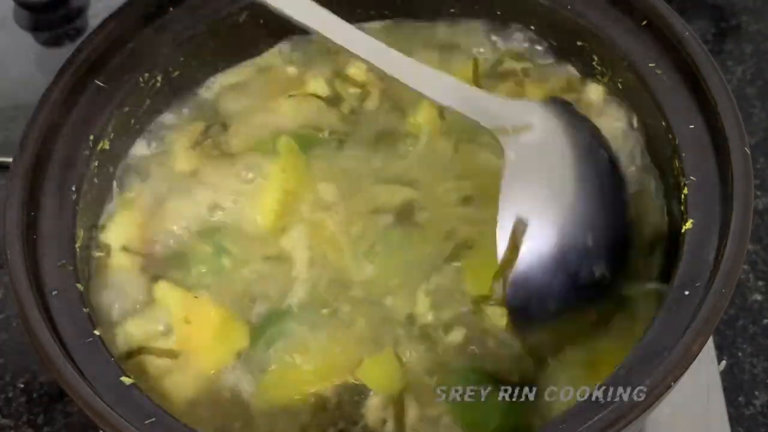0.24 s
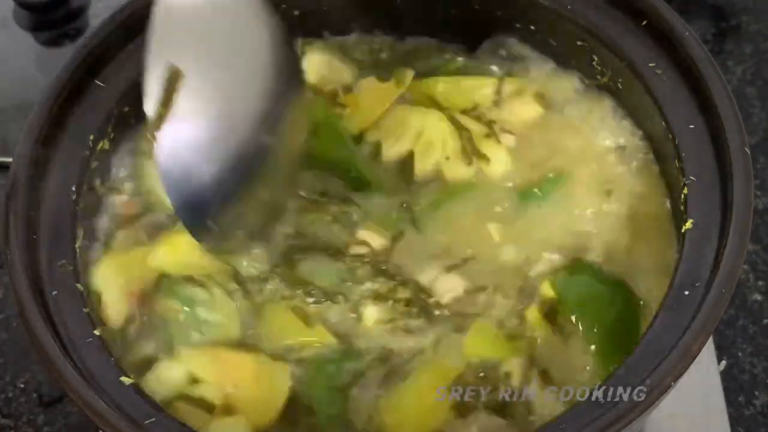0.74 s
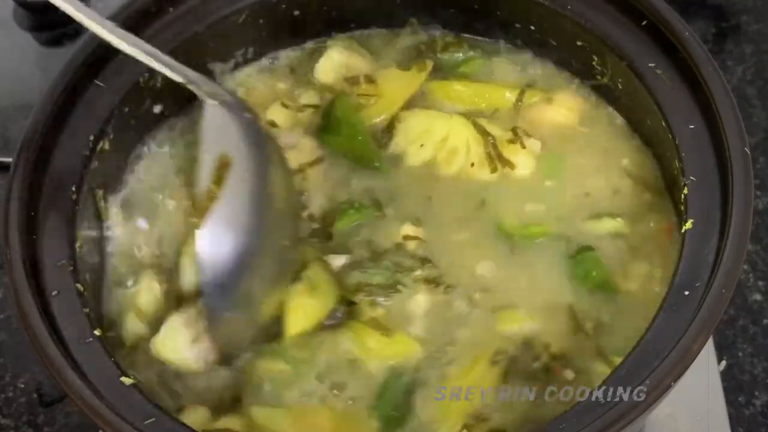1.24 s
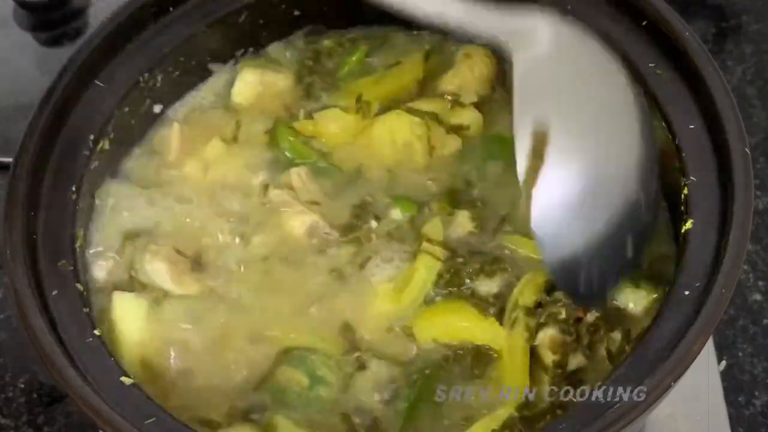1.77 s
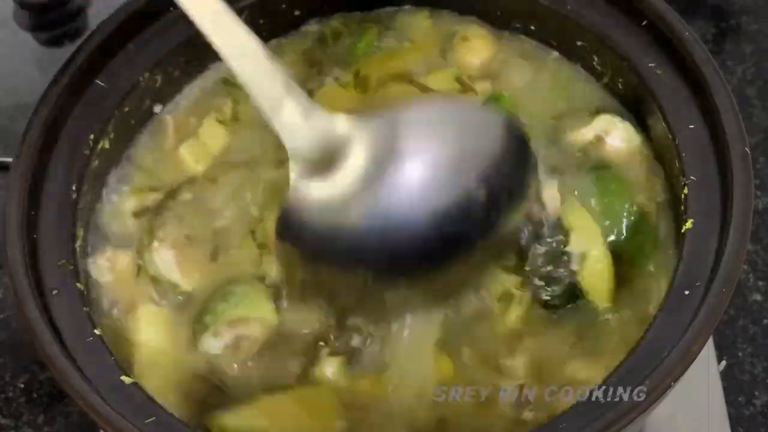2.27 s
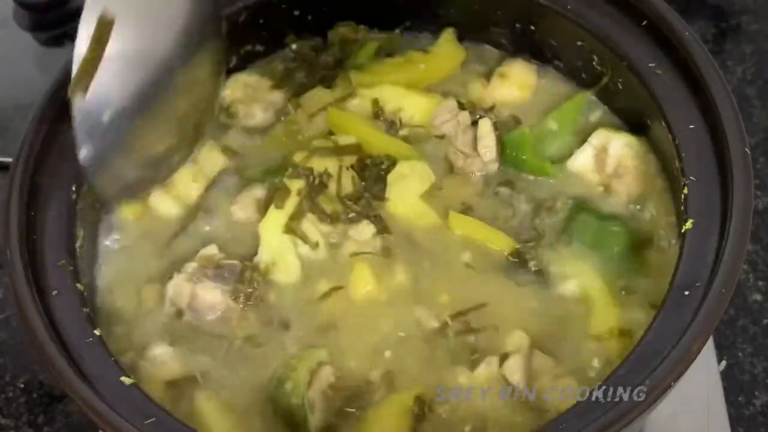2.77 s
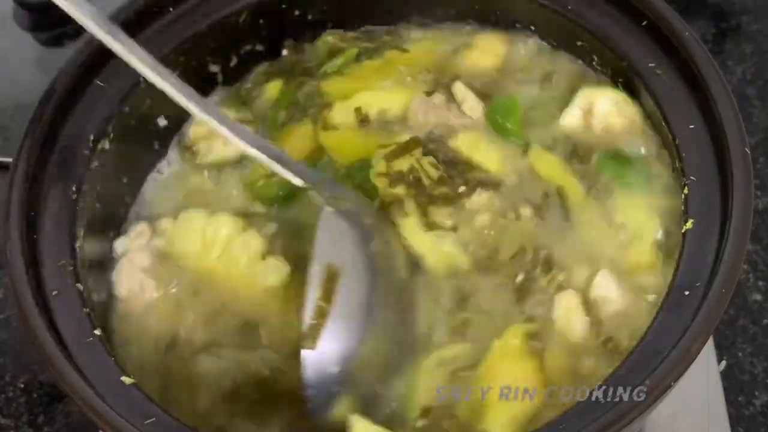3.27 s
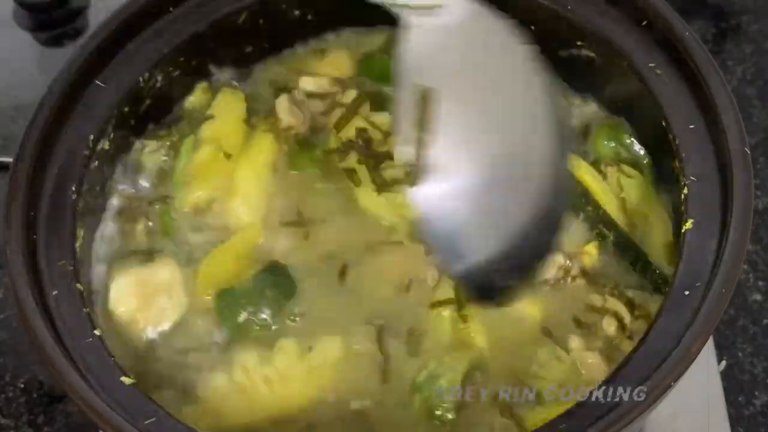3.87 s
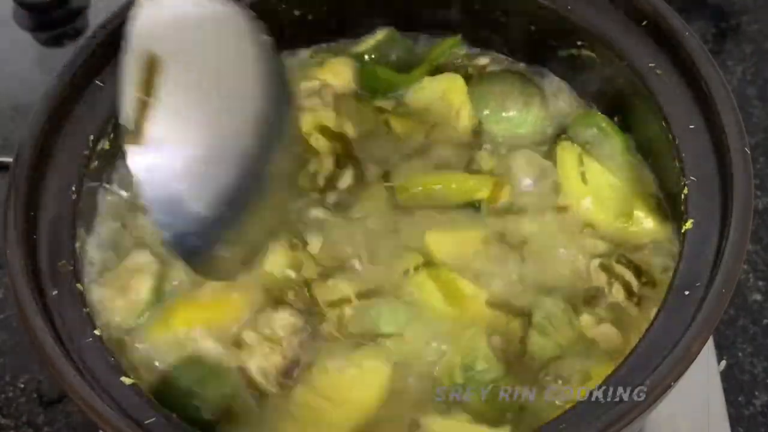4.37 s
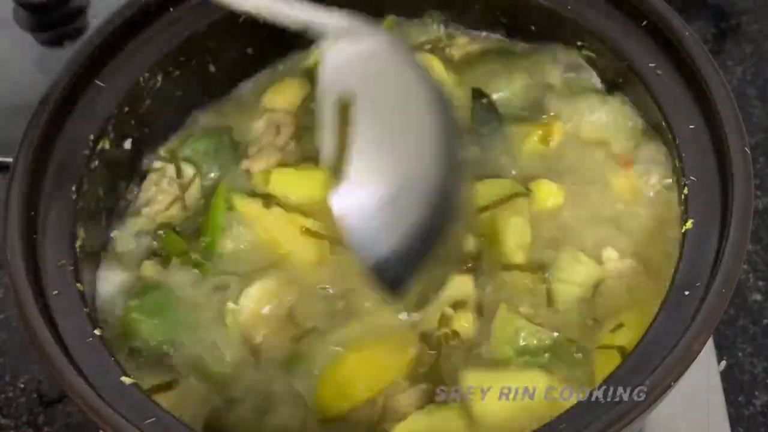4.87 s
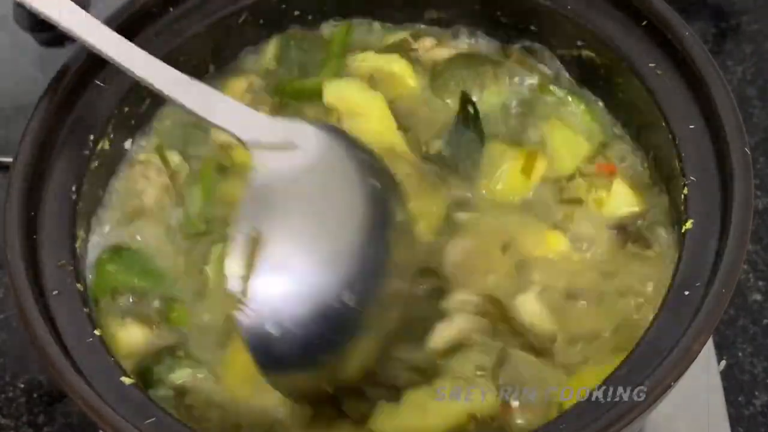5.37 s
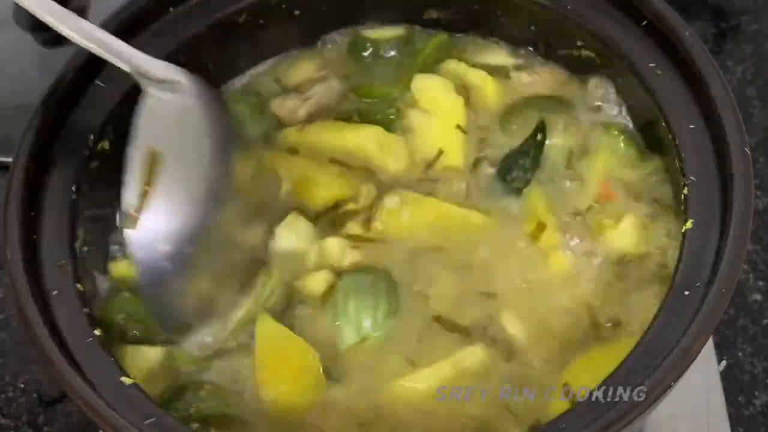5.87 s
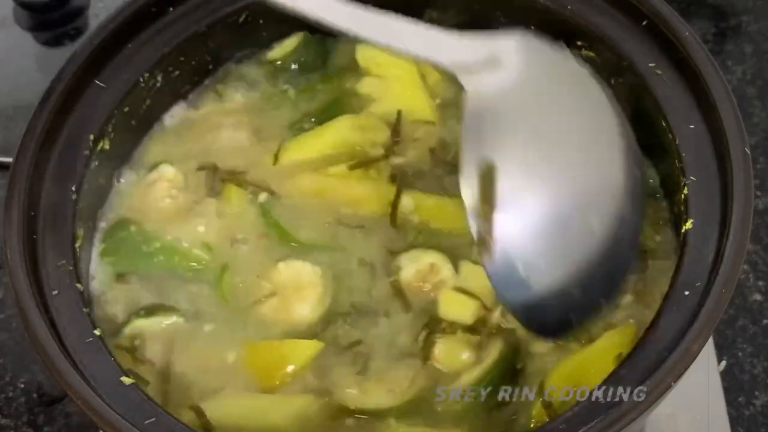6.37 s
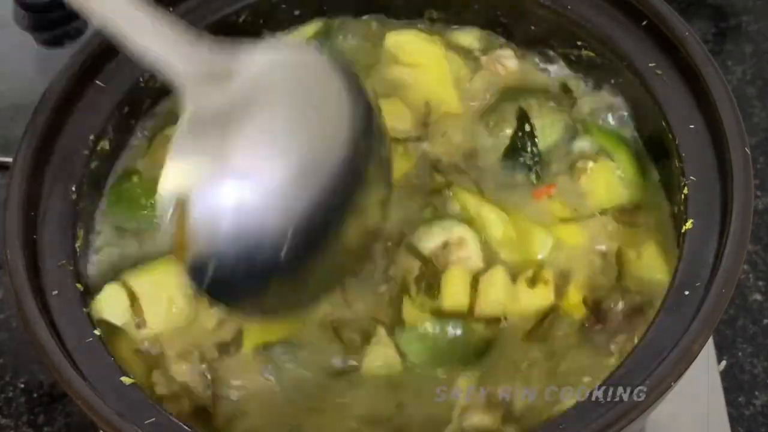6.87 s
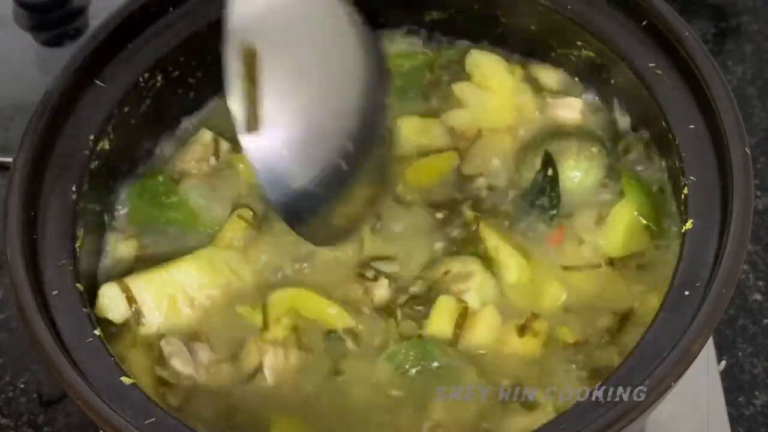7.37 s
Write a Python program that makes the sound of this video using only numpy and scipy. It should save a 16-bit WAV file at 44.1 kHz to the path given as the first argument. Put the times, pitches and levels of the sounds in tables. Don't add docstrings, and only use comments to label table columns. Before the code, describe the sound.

A thick soup simmers in a pot on a gas burner, heard very close in stereo in a small hard kitchen. Bubbles pop and glug, droplets tick on the hot wall. Near two seconds a steel ladle clinks and scrapes, then clinks louder with a quick rebound and drags. Bubbling carries on alone until a late ringing clink, and a hard dull knock under the soup near the end.

```python
import sys
import numpy as np
from scipy import signal
from scipy.fft import rfft, irfft, next_fast_len
from scipy.io import wavfile
from scipy.ndimage import uniform_filter1d, map_coordinates

SR = 44100
rng = np.random.default_rng(int(sys.argv[2]) if len(sys.argv) > 2 else 0)


def volts_from_decibels(level):
    exponent = np.asarray(level, float) / 20
    return 10 ** exponent


def int16_out(signal):
    q = np.round(np.clip(np.atleast_2d(signal).T, -1, 1) * 32767)
    wavfile.write(sys.argv[1], SR, q.astype(np.int16))


N = 336924


def unit(x):
    return x / np.sqrt(np.mean(x ** 2) + 1e-20)


def along(points, hz):
    f, v = np.transpose(points)
    return np.interp(np.log(hz + 1), np.log(f + 1), v)


def wobble(rate):
    knots = rng.standard_normal(int(N * rate / SR) + 4)
    return map_coordinates(knots, [np.arange(N) * rate / SR])


def filtered(x, response):
    m = next_fast_len(x.shape[-1] + 8192)
    return irfft(rfft(x, m) * response(np.fft.rfftfreq(m, 1 / SR)), m)[..., :x.shape[-1]]


def coloured(x, spectrum):
    return unit(filtered(x, lambda hz: volts_from_decibels(along(spectrum, hz))))


# f/Hz, correlation/1
ALIKE = [(70, .985), (200, .85), (350, .35), (620, .75), (1100, .65), (2300, .6), (4000, .25), (6500, .45),
         (8300, .97), (15000, .99)]


def rush(spectrum, patchy_db):
    z = signal.stft(rng.standard_normal((2, N)), nperseg=512)[2]
    field = uniform_filter1d(rng.standard_normal(z.shape[1:]), size=6, axis=0)
    field = uniform_filter1d(field, size=8, axis=1)
    pair = signal.istft(z * volts_from_decibels(patchy_db * unit(field)), nperseg=512)[1][:, :N]

    def mid_side(hz):
        angle = np.arccos(np.clip(along(ALIKE, hz), -1, 1)) / 2
        return volts_from_decibels(along(spectrum, hz)) * [np.cos(angle), np.sin(angle)]

    mid, side = filtered(pair, mid_side)
    return unit(np.array([mid + side, mid - side]))


def bubbles(s, gain, hz, t60, rise, size):
    t = np.arange(size) / SR
    hz, t60 = hz[:, None], t60[:, None]
    shape = volts_from_decibels(-60 * t / t60) * (1 - np.exp(-t * hz * 2.45))
    wave = gain[:, None] * shape * np.sin(2 * np.pi * hz * t * (1 + rise * t / t60))
    at = np.round(s * SR).astype(int)[:, None] + np.arange(size)
    return np.bincount(at.ravel(), wave.ravel(), N + size)[:N]


def swarm(count, centre_hz, octaves, cycles, spread_db, size):
    when, pitch, loud, sign = rng.random((count, 4)).T
    hz = centre_hz * 2 ** (octaves * (2 * pitch - 1))
    gain = volts_from_decibels(-spread_db * np.log(1.02 - loud)) * np.sign(sign - 0.5)
    return unit(bubbles(when * N / SR, gain, hz, cycles / hz, 0.2, size))


def impulses(s, db):
    return np.bincount(np.round(s * SR).astype(int), volts_from_decibels(db), N)[:N]


def puffs(s, db, t60):
    fade = volts_from_decibels(-60 * np.arange(2000) / SR / t60)
    return signal.fftconvolve(impulses(s, db), fade)[:N] * rng.standard_normal(N)


# f/Hz, width/Hz, level/dB
FILLED = [(115, 70, -4.5), (221.9, 23, 4), (626, 123, 1.5), (1400, 480, -4.5), (2373, 310, -6.5),
          (2900, 570, -6.5), (6000, 11000, -27.5)]


def full_pot(blows):
    def response(f):
        total = 0
        for k, (centre, width, db) in enumerate(FILLED):
            damping = 1j * f * width
            total = total + (-1) ** k * volts_from_decibels(db) * damping / (centre ** 2 - f ** 2 + damping)
        return total

    return filtered(blows, response)


# t/s, level/dB
BOIL = [(0.0, -49.5), (0.45, -57), (1.87, -57.5), (1.98, -52.5), (2.42, -59.5), (2.77, -56), (2.92, -55),
        (3.19, -59), (3.55, -54), (3.81, -64.5), (4.15, -68), (5.28, -59.5), (6.15, -64), (7.64, -58)]


def vigour():
    return np.interp(np.arange(N) / SR, *np.transpose(BOIL))


def strays(count):
    when, loud, pitch = rng.random((count, 3)).T
    db = vigour()[(when * N).astype(int)] + 12 + 8 * loud
    return np.transpose([when * N / SR, db, 1200 * 2 ** (0.55 * (2 * pitch - 1))])


# t/s, peak level/dB, f/Hz
POPS = [(0.01, -35, 1570), (0.067, -33, 800), (0.105, -46, 800), (0.302, -31.5, 900), (0.833, -35.5, 1320),
        (1.235, -38, 830), (1.281, -38, 1610), (1.325, -39, 920), (1.505, -39, 1500), (1.629, -38, 1320),
        (2.37, -39.5, 896), (2.471, -37, 1200), (2.713, -35, 900), (3.194, -30, 1780), (3.57, -32.5, 1280),
        (4.065, -45, 814), (4.703, -40.5, 802), (4.772, -42, 1460), (4.87, -40, 1640), (4.924, -38.5, 820),
        (5.133, -38.5, 1400), (5.412, -38, 1500), (5.47, -38.5, 815), (5.882, -32.5, 1250),
        (6.223, -38, 900), (6.632, -33, 2380), (6.726, -39, 1360), (7.018, -45, 886), (7.303, -39.5, 1700),
        (7.539, -38.5, 870),
        (0.316, -48, 619), (0.409, -44, 622), (0.984, -44, 638), (1.102, -42.5, 595), (1.315, -41, 773),
         (1.425, -36, 619), (1.811, -42, 713), (2.409, -41, 603), (2.57, -39, 802), (3.301, -43, 705),
         (3.729, -51, 641), (4.063, -44, 606), (4.428, -44, 802), (4.6, -44, 643), (4.86, -42, 791),
         (4.914, -51.5, 813), (5.245, -45.5, 622), (5.339, -42.5, 646), (5.463, -40, 807),
         (5.582, -42, 614), (6.204, -43.5, 633), (6.372, -37, 684), (6.563, -43.5, 641), (6.852, -43, 646),
         (7.352, -41, 646), (7.551, -56, 638)]
# t/s, peak level/dB, body level/dB
SPITS = [(0.803, -44.5, -16), (1.276, -54.5, -11), (2.36, -46, -18), (2.6396, -44.5, 0),
         (3.164, -38.5, -16), (3.1966, -44, 10), (3.7908, -48, 6), (4.1434, -47.5, -11.5),
         (4.1719, -52.5, -21), (4.4186, -44, -17.5), (4.5284, -41, 3), (4.5494, -46, -16),
         (4.5852, -44, -21), (4.658, -47, -14), (4.799, -44, -10), (4.8309, -44, -3),
         (4.8724, -43.5, -13.5), (4.9245, -38.5, 1.5), (4.9357, -37.5, -20), (5.1054, -50.5, -21),
         (5.3453, -47, -24), (5.4256, -49.5, -17), (6.1489, -45, -24), (6.2352, -42.5, -16),
         (6.2992, -45, 2), (6.3794, -47, -2), (6.8553, -43, -6), (6.9232, -42, -17), (7.3543, -46, 13.5),
         (7.452, -48.5, -14)]
# f/Hz, level/dB
FIZZ = [(1000, 11), (2500, 7), (4200, 0.5), (6500, -9), (8000, 1), (10000, 3.5), (13500, 1), (15700, -18.5)]


def bursts():
    s, db, hz = np.vstack([POPS, strays(count=110)]).T
    t60 = 0.018 * (1000 / hz) ** 1.6
    pops = bubbles(s, volts_from_decibels(db + 6.5), hz, t60, 0.019, size=1300)
    jolts = volts_from_decibels(18.5) * full_pot(puffs(s, db, t60=0.006))
    s, db, body_db = np.transpose(SPITS)
    ticks = filtered(puffs(s, db + 3.0, 0.013), lambda f: volts_from_decibels(along(FIZZ, f)) * (f > 5000))
    bodies = filtered(puffs(s, db + body_db + 8, 0.009), lambda f: 1 / (1 + ((f - 4000) / 1300) ** 4))
    return pops + jolts + ticks + bodies


# t/s, peak level/dB, place on the wall/1 (0 to 2), glancing/1 (0 square, 1 glancing)
CLINKS = [
    (1.868, -9.5, 0.24, 0.26),
    (2.7729, -7.5, 0.84, 0.39),
    (2.884, -14, 1.08, 0.9),
    (5.7293, -8.5, 1.44, 0.26),
]
# level/dB at place 0, place 1, place 2, t60/s
WALL = [(-26, -11.5, -19, 0.29), (-18, -37, -45.5, .38), (-4, -26, -32, .3), (-17, -23, -19, .18),
        (-12.5, -15.5, -25, .25), (-17.5, -14.5, -13.5, 0.42), (0.5, -3, -29, .25), (-2, -5.5, -31.5, 0.24),
        (-13.5, -22, -20, .34), (-22, -6, -45, .15), (-14, -11, -10, .1), (-17.5, -26.5, -44, .44),
        (-25, -21.5, -24, 0.35), (-44.5, -29, -31, .27)]
# level/dB at place 0, place 1, place 2, t60/s
LADLE = [(-14.5, -15.5, -18.5, 0.75), (-16, -16, -13, .4), (-4, -7, 3.5, .5), (-1, -8, 11, .45),
         (-17, -7, -6, .35), (-21, -7.5, -16, .35), (-24, -9, -14, 0.25), (-36, -14, -23, 0.54),
         (-34.5, -8, -15, .38), (-35, -13, -20, .13), (-33.5, -15.5, -21, 0.49), (-23.5, -13.5, -15.5, .35),
         (-34, -21, -2.5, 0.1), (4.5, -25.5, -8, 0.042)]
WALL_HZ = [689, 793, 877, 1200, 1660, 1810, 1903, 1935, 2200, 2488, 2800, 3095, 3725, 6900]
LADLE_HZ = [3242, 3300, 3330, 3360, 3410, 3483, 3540, 5135, 5265, 5545, 7140, 7285, 9420, 13050]
# f/Hz, level/dB at place 0, place 1, place 2
BOWL = [(1922, -24, -15, -12), (3371, 7.5, -6.5, 7), (5346, -59, -4, -23.5)]
# f/Hz, level/dB
CRACK = [(150, -41), (450, -34), (800, -8.5), (1300, -12), (2000, -5.5), (3400, 3), (4600, -17.5),
         (7500, -12), (8500, -41), (16000, -41)]


def clinks():
    size = 21000
    out, t = np.zeros((2, N + size)), np.arange(size) / SR
    late = t - np.array([[0], [70e-6]])
    scatter = 0.1
    hz = np.c_[WALL_HZ + LADLE_HZ]
    *places_db, t60 = np.transpose(WALL + LADLE)[..., None]
    for s, db, place, glancing in CLINKS:
        length = 1.08 + 0.72 * glancing
        crack_db = -7 + 3 * glancing
        tick_db = -18.5 + 14.5 * glancing
        level_db = sum(np.clip(1 - abs(place - k), 0, 1) * at_db for k, at_db in enumerate(places_db))
        fade = volts_from_decibels(-60 * t / (t60 * length)) + 0.937 * volts_from_decibels(-60 * t / 0.068)
        drift = rng.standard_normal((2, 2, len(hz), 35))
        size_drift, phase_drift = signal.resample(drift, size, axis=3)
        turns = hz * late[:, None] + scatter * rng.standard_normal((2, len(hz), 1))
        turns += 0.13 * phase_drift * np.tanh(t / 0.08)
        modes = volts_from_decibels(level_db - 18.0 + 4.7 * size_drift) * fade * np.sin(2 * np.pi * turns)
        ring = modes.sum(axis=1)
        for bowl_hz, *bowl_db in BOWL:
            face = bowl_hz * late + scatter * rng.standard_normal((2, 1))
            pulse = np.exp(-((t - 0.0035) / 0.005) ** 2)
            ring += volts_from_decibels(np.interp(place, range(3), bowl_db) - 2.5) * pulse * np.sin(2 * np.pi * face)
        crack_fade = volts_from_decibels(-60 * t / 0.044) + 0.11 * volts_from_decibels(-60 * t / 0.12)
        crack = volts_from_decibels(crack_db) * crack_fade * coloured(rng.standard_normal(size), CRACK)
        tick = volts_from_decibels(tick_db - 60 * t / 0.018) * coloured(rng.standard_normal(size), FIZZ)
        onset = 1 - np.exp(-(t / 0.001) ** 2)
        start = round(s * SR)
        out[:, start:][:, :size] += volts_from_decibels(db) * (ring + crack + tick) * onset
        swell = np.exp(-t[::-1] / 0.006) * coloured(rng.standard_normal(size), CRACK)
        out[:, :start + 20][:, -size:] += volts_from_decibels(db - 22) * swell
    return out[:, :N]


# t/s, thud level/dB, tone f/Hz, tone level/dB
KNOCKS = [
    (1.854, -48, 1500, -27),
    (7.041, -33.5, 2230, -29),
    (7.1631, -13, 1400, -11),
]


def knocks():
    s, db, hz, bowl_db = np.transpose(KNOCKS)
    thud = full_pot(impulses(s, db + 16.0) + puffs(s, db + 14, 0.034))
    return thud + bubbles(s, volts_from_decibels(bowl_db), hz, np.array([0.014, 0.018, 0.009]), 0, size=1500)


# t/s at full pressure, rise/s, hold/s, level/dB, edge level/dB
SCRAPE = [
    (2.072, 0.022, 0.033, -42, -5.5),
    (2.914, 0.028, 0.12, -44, 0),
    (3.543, 0.16, 0.02, -44, -7),
    (6.628, 0.069, .005, -52, -7),
    (7.174, 0.0097, 0.029, -40.5, -5.5),
]
# f/Hz, level/dB
RASP = [(250, -28), (450, -5), (700, -2), (1000, 0.5), (1400, -4), (2200, -2.5), (3200, -4.5), (4500, -20)]
# f/Hz, level/dB
EDGE = [(1200, -27.5), (2500, 13), (3800, 11.5), (5200, 8), (7500, -2), (9000, -9), (15700, -50.5)]


def scrape():
    out = np.zeros((2, N))
    crowd = swarm(count=2500, centre_hz=1400, octaves=0.6, cycles=8.7, spread_db=2.5, size=500)
    rasp = 0.66 * rush(RASP, patchy_db=2.5) + 0.55 * coloured(crowd, RASP)
    edge = rush(EDGE, patchy_db=3)
    chatter = volts_from_decibels(1.6 * wobble(70))
    t = np.arange(N) / SR
    for s, rise, hold, db, edge_db in SCRAPE:
        lifting = np.clip(t - s - hold, 0, None)
        press_db = db - 19 * np.clip(s - t, 0, None) / rise - 111 * lifting
        edge_gain = volts_from_decibels(edge_db - 1.5 - 13.5 * lifting)
        out += volts_from_decibels(press_db + 3.0) * chatter * (rasp + edge_gain * edge)
    return out


# f/Hz, level/dB
RUMBLE = [(22, -54), (40, -5), (55, 0), (105, 1), (135, -3.5), (230, -2), (330, -12), (450, -27),
          (900, -55.5)]
# f/Hz, level/dB
BROTH = [(250, -22), (400, -14), (640, 4), (870, -4), (1050, -5), (1400, -11), (2100, -16.5), (3500, -9),
         (6000, -38), (12000, -40.5)]


def simmer():
    vigour_db = vigour()
    swing_db = vigour_db - vigour_db.mean()
    rumble_db = -55 + 0.15 * swing_db
    broth_db = vigour_db + 1
    fizz_db = -59.5 + 0.19 * swing_db - 0.05 * np.arange(N) / SR
    surge = wobble(9)

    bed = volts_from_decibels(rumble_db + 1.5 + 2.2 * wobble(12)) * rush(RUMBLE, patchy_db=0.5)
    bed += volts_from_decibels(broth_db - 3.0 + 2.5 * surge) * rush(BROTH, patchy_db=4.1)
    bed += volts_from_decibels(fizz_db + 2.5 + 0.27 * surge + 2.0 * wobble(30)) * rush(FIZZ, patchy_db=2.2)
    jet = filtered(rng.standard_normal((2, N)), lambda hz: 1 / (1 + ((hz - 5700) / 90) ** 2))
    bed += volts_from_decibels(-74.5 + 2.5 * wobble(5.6)) * unit(jet)

    middling = swarm(count=900, centre_hz=1200, octaves=1.0, cycles=10.0, spread_db=6.0, size=700)
    low = swarm(count=300, centre_hz=656, octaves=0.31, cycles=22, spread_db=-0.5, size=2000)
    deep = swarm(count=150, centre_hz=183, octaves=0.39, cycles=14.0, spread_db=2.5, size=3000)
    tiny = swarm(count=4000, centre_hz=8900, octaves=0.83, cycles=6, spread_db=3.0, size=60)
    crowd = volts_from_decibels(broth_db - 0.9 + 5.0 * surge) * middling
    crowd += volts_from_decibels(broth_db - 4.0 + 2.44 * wobble(7.6)) * low
    crowd += volts_from_decibels(rumble_db - 5.0) * deep
    crowd += volts_from_decibels(fizz_db - 3.0 + 2.7 * wobble(25)) * tiny
    return bed, crowd


# f/Hz, t60/s
KITCHEN = [(200, 0.32), (1500, 0.358), (5000, 0.37), (12000, 0.034)]


def kitchen(x):
    hz, t, z = signal.stft(rng.standard_normal((2, SR // 2)), SR, nperseg=256)
    hz = hz[:, None]
    decay = volts_from_decibels(-60 * t / along(KITCHEN, hz)) / (1 + (hz / 6500) ** 4)
    tail = signal.istft(z * decay, SR, nperseg=256)[1]
    delayed = np.pad(x, (150, 0))[None]
    return signal.fftconvolve(delayed, tail / np.linalg.norm(tail[0]), axes=1)[:, :N]


def scene():
    bed, crowd = simmer()
    soup, thud, ring = crowd + bursts(), knocks(), clinks()
    room = kitchen(volts_from_decibels(-13.5) * soup + volts_from_decibels(-18) * thud + volts_from_decibels(-11) * ring[0])
    return soup + thud + ring + room + bed + scrape()


# f/Hz, phase lead/rad
LEAD = [(0, 0), (450, -1.7), (750, -1.9), (1000, -3.1), (1700, -6.3), (2100, -8.3), (3300, -9.2),
        (5000, -11.6), (5700, -10.3), (6100, -8.2), (7000, -6.28), (16680, 12.57)]
# f/Hz, level/dB
TILT = [(85, -.5), (160, -4.5), (330, -5), (650, .5), (1400, 7), (2000, 2.5), (4200, 2), (5500, -1),
        (8000, .5), (15000, 0)]


def ports(dry):
    half = np.array([[-0.5], [0.5]])

    def response(hz):
        lead = half * np.interp(hz, *np.transpose(LEAD))
        return volts_from_decibels(-half * along(TILT, hz)) * np.exp(1j * lead) * (hz < 15800)

    return filtered(dry, response)


def low_pass(x):
    return signal.sosfilt(signal.butter(12, 15780, fs=SR, output="sos"), x)


def record(dry):
    return low_pass(ports(dry))


dry = scene()
out = record(dry)
int16_out(out)
```